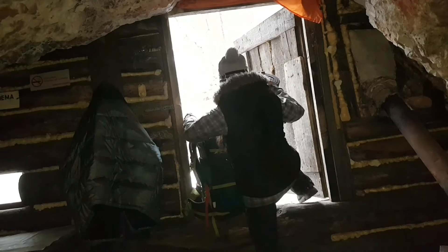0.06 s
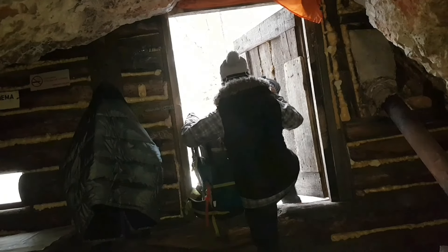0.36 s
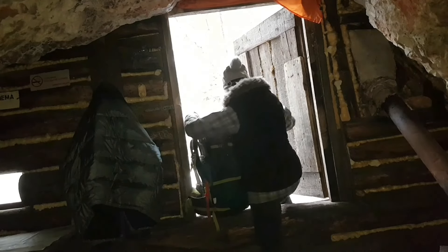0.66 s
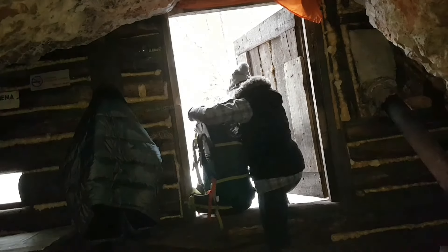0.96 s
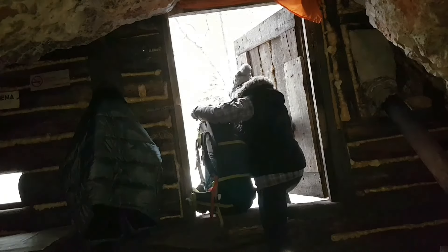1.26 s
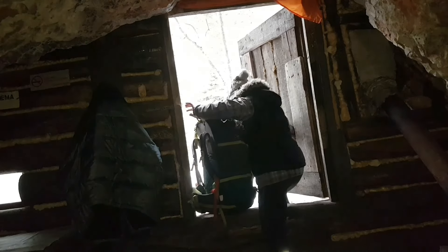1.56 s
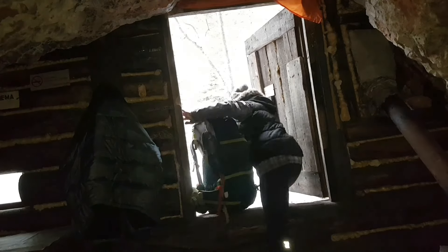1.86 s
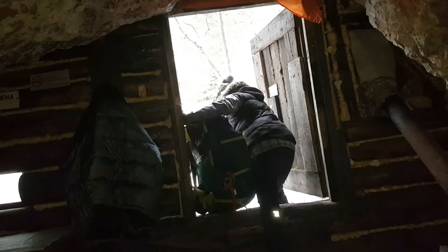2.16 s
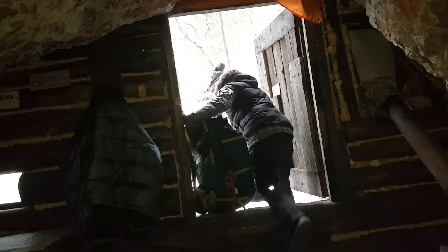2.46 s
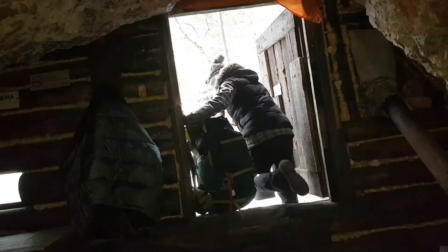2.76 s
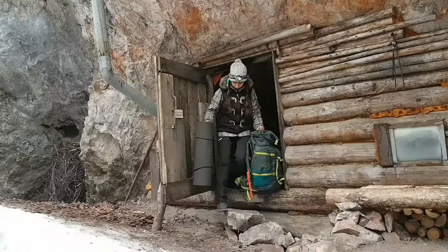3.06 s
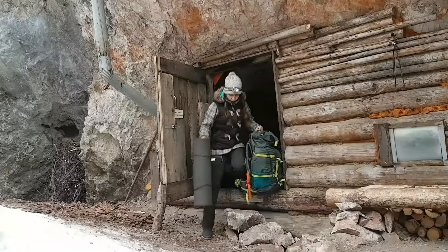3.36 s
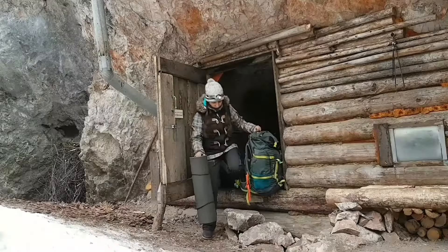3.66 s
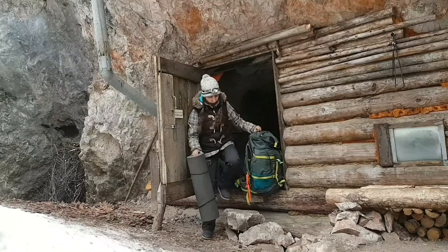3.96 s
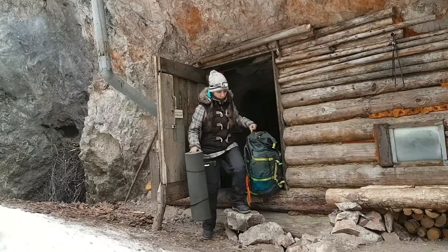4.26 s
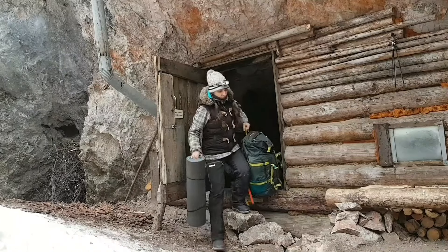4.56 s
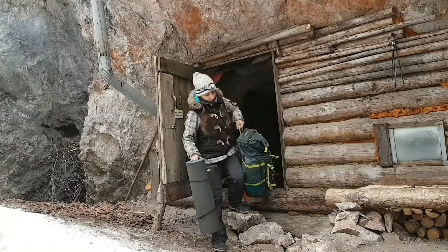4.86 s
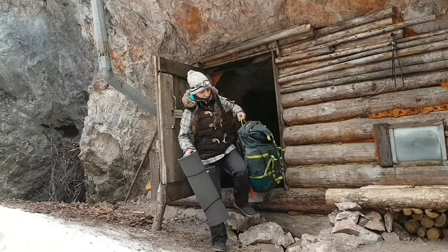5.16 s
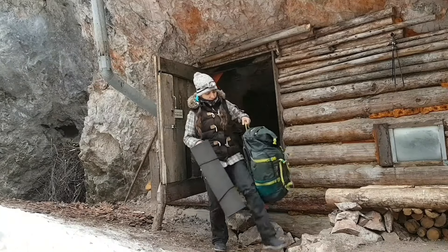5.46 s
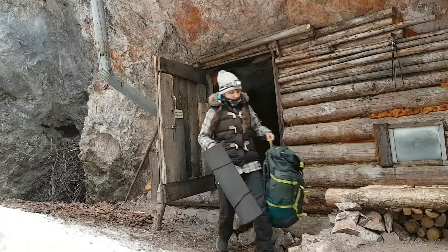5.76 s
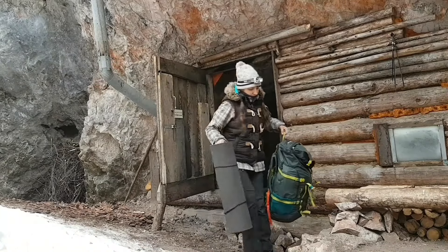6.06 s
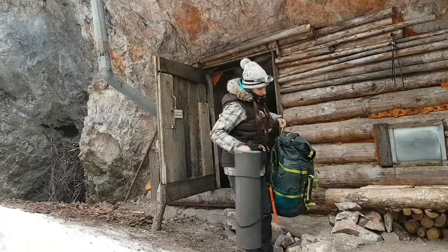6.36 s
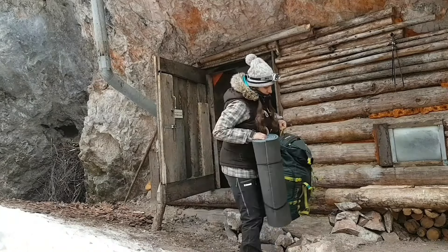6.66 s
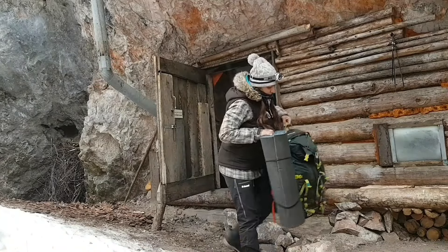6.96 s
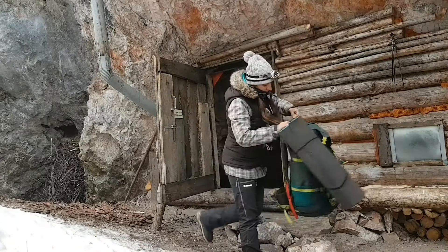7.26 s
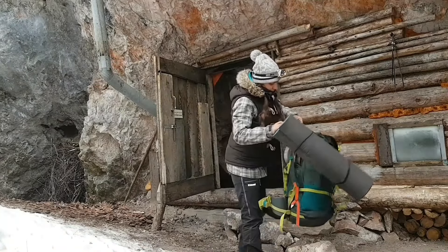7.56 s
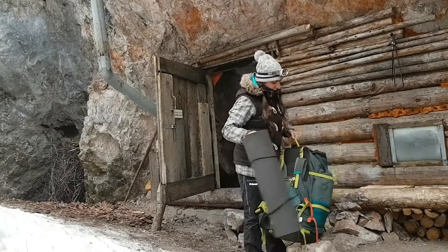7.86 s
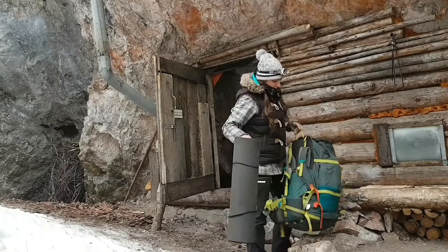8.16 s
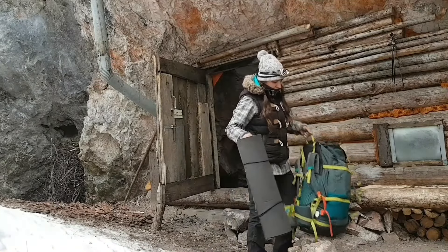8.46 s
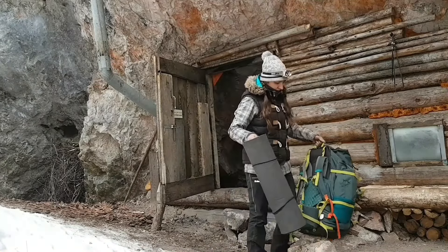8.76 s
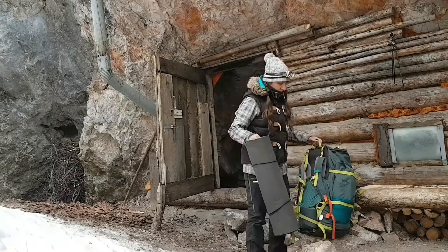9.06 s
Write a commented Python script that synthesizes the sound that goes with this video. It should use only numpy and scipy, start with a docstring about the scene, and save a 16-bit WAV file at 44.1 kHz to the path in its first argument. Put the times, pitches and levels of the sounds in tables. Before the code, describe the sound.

Inside a small log hut, boots and a loaded backpack thud and drag on hollow planks while a padded jacket swishes and straps scrape. After about three seconds the sound jumps outside and turns drier: scattered steps and bumps on stones and gritty soil, softer nylon rustling, a buckle tick, and the pack being set down. A stereo microphone a few metres away also catches faint air and hiss.

```python
"""A log hut in the mountains: a hiker in a padded jacket lugs a backpack over the plank floor and sill.
From 3 s on we listen from outside, where the pack is set down and shifted. Boots and pack thud on
ringing boards, then on stones and gritty soil; nylon swishes and crinkles in tiny catches, straps
scrape and snap, a buckle ticks. A small stereo microphone a few metres away hears it all over
faint mountain air, a draught in the doorway and its own hiss."""
import sys
import numpy as np
from scipy import signal
from scipy.fft import rfft, irfft, next_fast_len
from scipy.io import wavfile
from scipy.ndimage import uniform_filter1d

SR = 44100
rng = np.random.default_rng(int(sys.argv[2]) if len(sys.argv) > 2 else 0)


def inscribe(sig):
    """Save sig as 16-bit PCM at rate SR to the path in sys.argv[1].

    A 1-D sig is mono; a 2-D sig holds one channel per row.
    Samples are clipped to [-1, 1] before scaling.
    """
    pcm = np.round(np.clip(np.atleast_2d(sig).T, -1, 1) * 32767)
    wavfile.write(sys.argv[1], SR, pcm.astype(np.int16))


N = 402191
OUTSIDE_S = 3.008  # the point of view jumps from hut to yard
IDLE_WANDER_DB = 1.1

# tone of still air, scuffed grit, sliding nylon and microphone hiss: f/Hz, relative level/dB
AIR_TONE = [(20, -32), (45, -3), (156, -1), (320, -3.5), (582, -8), (1020, -20), (1750, -17), (2120, -20.5),
            (4200, -28.5), (15500, -44)]
GRIT_TONE = [(150, -26), (250, -24), (335, 5), (852, -6), (1380, -12.5), (1730, -13.5), (2060, -19),
             (3630, -26.5), (6770, -34), (9070, -28.5), (15500, -30)]
NYLON_TONE = [(53, -43), (90, 1), (172, 4), (288, -7.5), (586, -4.5), (810, -8.5), (2050, -9.5),
              (2650, -12), (3800, -18.5), (7140, -24.5), (15500, -41)]
HISS_TONE = [(6500, -17), (8200, -9.5), (15500, -3)]
# stereo width of diffuse sound: f/Hz, side against mid/dB
STEREO_WIDTH = [(60, -9), (250, -7), (500, -6), (1250, 2.5), (2100, 0), (5500, 3.5), (8300, -7),
                (15000, -8)]
# gusts through the doorway: crest t/s, half-length/s, level/dB
DOOR_GUSTS = [(.2, 0.55, -50), (1.376, 0.34, -42.5), (1.89, 0.61, -53.5)]
# boot and pack hits: t/s, thud level/dB, f/Hz, hardness (scuff against thud)/dB, load t60/s
HITS = [(0.001, -33.5, 85.6, -20.5, 0.48), (0.075, -20, 100.5, -21.5, 0.53), (0.099, -24.5, 336, -34, 0.37),
        (0.112, -26, 127, -18, 0.39), (0.183, -28, 161, -12, 0.41), (0.66, -28.5, 94.7, -23, 0.36),
        (0.667, -28.5, 174, -9, 0.3), (0.717, -32, 102, -32, 0.3), (0.908, -32, 110, -15.5, 0.65),
        (1.181, -28.5, 693, -13, 0.32), (1.542, -25.5, 333, -22, 0.37), (1.839, -31.5, 184, -2.5, 0.97),
        (2.078, -35, 486, -9.5, 0.45), (2.486, -44.5, 510, -11, .05), (3.413, -31.5, 514, -8, 0.39),
        (3.416, -38, 104, -11, 0.4), (3.469, -44.5, 260, -5, 0.34), (4.16, -32.5, 124, -17.5, 0.11),
        (4.188, -27.5, 464, -15, 0.27), (4.189, -28, 224, -11, 0.15), (4.219, -35.5, 124, -21, 0.44),
        (4.242, -38, 111, -35, 0.55), (4.573, -31, 160, -10, 0.61), (4.652, -33.5, 400, -10, 0.11),
        (5.62, -29.5, 247, -17, 0.31), (5.761, -42, 438, -6, 0.41), (5.806, -36, 494, -11, 0.17),
        (6.266, -36.5, 416, -14, .1), (6.274, -33.5, 135, -17, 0.42), (6.506, -39.5, 215, -10, 0.43),
        (6.545, -39.5, 174, -20, 0.7), (6.696, -22.5, 97.4, -15.5, 0.16), (6.708, -31, 189, -5.5, 0.085),
        (6.896, -40, 149, -13, 0.64), (7.821, -24, 153, -20, 0.29), (7.992, -36.5, 146, -15, 0.11),
        (8.55, -30.5, 165, -16, 0.39), (8.754, -44.5, 216, -14, 0.091)]
# modes of the plank floor: f/Hz, relative level/dB, t60/s
PLANK_MODES = [(87.6, 4, 0.39), (160, -2.5, 0.36), (203.3, 4, 0.31), (330, -1, 0.54), (543, 10, 0.6)]
# nylon on nylon and wood: crest t/s, half-length/s, swish level/dB, hollow trim/dB, fizz trim/dB
NYLON_STROKES = [(0.057, 0.27, -56, 0.5, -9.5), (0.154, 0.096, -55.5, 6, 1.5),
                 (0.429, 0.48, -56, 2.5, -12.5), (0.772, 0.48, -50, 2, -10), (0.997, 0.61, -60, 6, -15),
                 (1.49, 0.55, -55, 3.5, -14), (1.658, 0.3, -51, 0.5, -12), (1.854, 0.22, -39, -0.5, -11.5),
                 (1.995, 0.26, -46, 1, -13.5), (2.224, 0.27, -50.5, 0.5, -8),
                 (2.351, 0.44, -51.5, -0.5, -10.5), (2.922, 0.042, -71, -6, 12.5),
                 (2.94, 0.99, -57, 1.5, -12.5), (3.442, 0.19, -66.5, 11, -6), (4.618, 0.31, -57, 0.5, -8),
                 (5.337, 0.25, -55.5, -13, -4.5), (5.4, 0.2, -56, -2.5, -8.5), (5.71, 0.29, -61.5, 2, -8),
                 (5.891, 0.15, -61.5, 1.5, -5), (5.983, 0.053, -52.5, -7, -2.5),
                 (6.297, 0.28, -67, 3.5, -9), (6.535, 0.45, -69.5, 6.5, -11),
                 (6.917, 0.089, -59.5, 1.5, -9), (7.025, 0.1, -63, 2.5, -9), (7.127, 0.083, -60, 2, -7),
                 (7.269, 0.3, -57, -7, -11), (7.637, 0.082, -59, 1.5, -17), (7.698, 0.11, -61.5, 1, -16),
                 (7.755, 0.093, -59, -10, -9.5), (7.829, 0.061, -53, 7.5, -12),
                 (7.85, 0.26, -57.5, 1, -8.5), (8.051, 0.19, -48.5, 5, -13.5),
                 (8.11, 0.11, -50, -0.5, -9.5), (8.454, 0.14, -62.5, 5.5, -11), (8.55, 0.14, -48, 6, -9.5),
                 (8.66, 0.19, -61.5, 1.5, -8)]
# treble bands of the crinkling creases: low f/Hz, high f/Hz
CREASE_BANDS = [(8000, 10560), (10200, 13100), (13000, 15100)]
# fabric and straps pulled over an edge: crest t/s, half-length/s, level/dB, start f/Hz, end f/Hz
STRAP_SCRAPES = [(0.073, .04, -47, 1000, 893), (0.134, .05, -50, 1035, 1647),
                 (0.391, 0.11, -60, 2650, 2450), (0.83, 0.2, -56, 2256, 2710),
                 (1.572, 0.073, -49.5, 860, 758), (1.82, 0.051, -41, 1200, 760),
                 (1.88, 0.14, -48.5, 1258, 1500), (1.903, .13, -44, 2200, 1500),
                 (2.215, 0.11, -49, 1495, 1189), (6.633, 0.0397, -53, 250, 280),
                 (7.812, 0.03, -51, 1040, 873), (8.048, .05, -51, 517, 464), (8.461, 0.06, -54.5, 500, 367),
                 (8.553, 0.065, -47.5, 1150, 1450)]
# the loaded pack sliding on the planks: crest t/s, half-length/s, level/dB
PACK_DRAGS = [(0.117, 0.08, -36), (0.21, 0.1, -40.5), (0.707, 0.13, -39.5), (0.834, 0.1, -40),
              (1.89, 0.09, -41)]
# cracks of grit and straps: t/s, peak level/dB, f/Hz
GRIT_SNAPS = [(3.412, -38.5, 1900), (3.498, -49.5, 2370), (4.19, -38, 1630), (5.052, -51, 1800),
              (5.976, -44, 3020), (6.266, -39.5, 726), (6.699, -34, 1330), (8.412, -50, 1400)]
# taps on the buckle: t/s, strike level/dB
BUCKLE_TAPS = [(5.056, -48), (5.866, -38.5), (5.875, -37.5)]
# modes of the plastic buckle: f/Hz, relative level/dB, t60/s
PLASTIC_MODES = [(4660, -6.5, 0.013), (5390, -12, 0.0092), (12400, -14, .005)]
# the hiker's rustle moves to the right in the yard: t/s, left channel lag/ms
LEFT_LAG = [(5.8, 0.0098), (8.2, 0.16)]


def undb(db):
    """Decibels to gain."""
    return 10 ** (np.asarray(db) / 20)


def unit(x):
    """Scale to rms 1."""
    return x / np.sqrt(np.mean(x ** 2))


def fade(t, t60):
    """Exponential decay, 60 dB down at t60."""
    return np.exp(-np.log(1000) * t / max(t60, 1e-3))


def add(track, s, sound):
    """Mix a sound into a track at time s."""
    i = max(int(s * SR), 0)
    track[i:i + len(sound)] += sound[:N - i]


def colour(x, points):
    """EQ with a curve of f/Hz, level/dB points."""
    size = next_fast_len(N, True)
    hz, db = np.transpose(points)
    f = np.maximum(np.arange(size // 2 + 1) * SR / size, 1)
    curve = undb(np.interp(np.log(f), np.log(hz), db))
    return irfft(rfft(x, size) * curve, size)[..., :N]


def band(x, lo_hz, hi_hz, order=2):
    """Band-pass."""
    return signal.sosfilt(signal.butter(order, [lo_hz, hi_hz], "band", fs=SR, output="sos"), x)


def wander(rate_hz):
    """Random modulator at rms 1, gliding from value to value."""
    hold = int(SR / rate_hz)
    return unit(uniform_filter1d(np.repeat(rng.standard_normal(N // hold + 1), hold), hold)[:N])


def grains(per_s, spread_db, smooth_db):
    """Mid and side of tiny catches of uneven size over a smooth hiss."""
    hiss = rng.standard_normal((2, N))
    sizes = undb(spread_db * np.minimum(rng.exponential(size=N), 4))
    catches = sizes * (rng.random(N) < per_s / SR)
    return unit(catches * rng.standard_normal((2, N))) + undb(smooth_db) * hiss


def stereo(pair, side_db):
    """Mid and side to left and right, with the mid at rms 1."""
    mid, side = pair[0], undb(side_db) * colour(pair[1], STEREO_WIDTH)
    return np.array([mid + side, mid - side]) / np.std(mid)


def resonate(x, modes):
    """Ring a set of damped modes with x."""
    t = np.arange(SR // 2) / SR
    ring = sum(undb(db) * np.sin(2 * np.pi * hz * t) * fade(t, t60) for hz, db, t60 in modes)
    return signal.fftconvolve(x, ring)[:N]


def swell(crest, half_s, rise_share=0.47, flatness=1.75):
    """Envelope of a move that gathers speed and runs out smoothly."""
    speed = np.zeros(N)
    start, end = crest - 2 * rise_share * half_s, crest + 2 * (1 - rise_share) * half_s
    t = np.arange(max(start, 0), end, 1 / SR)
    add(speed, t[0], np.exp(-2 * np.interp(t, [start, crest, end], [2, 0, 2]) ** flatness))
    return speed


def air_bed(air_db=-60.5, stir_db=-68, hiss_db=-69):
    """Steady mountain air, a faint uneven stir of clothes and mono microphone hiss."""
    air = stereo(colour(rng.standard_normal((2, N)), AIR_TONE), side_db=-0.11)
    stir = stereo(band(rng.standard_normal((2, N)), 350, 1030), side_db=-1.1)
    stir *= undb(IDLE_WANDER_DB * wander(9) + 2 * wander(45))
    hiss = unit(colour(rng.standard_normal(N), HISS_TONE))
    return undb(air_db) * air + undb(stir_db) * stir + undb(hiss_db) * hiss


def draught(steady_db=-71.5):
    """Air through the doorway rumbles on the microphone, with a few gusts."""
    flow = undb(steady_db) + sum(undb(db) * swell(s, half_s) for s, half_s, db in DOOR_GUSTS)
    return flow * unit(band(rng.standard_normal(N), 15, 72))


def boot_and_pack_hits(contact_cycles=0.37, sag=0.1, sag_cycles=0.61, overtone_ratio=2.54,
                       padding_hz=420, shake_db=-15, shake_cycles=26, load_db=-14, settle_db=-21):
    """Two layers: damped thuds with the rumble of the shaken load, and scuffs of crushed grit."""
    thuds, scuff_power = np.zeros((2, N))
    t = np.arange(SR // 2) / SR
    for s, db, hz, hard_db, load_t60 in HITS:
        sustain, load_hz = (2.46, (69.5, 194)) if s < OUTSIDE_S else (1, (97, 214))  # planks or soil
        t60 = sustain * 0.07 * (99 / hz) ** 0.69  # higher thuds die sooner
        contact = 1 - np.exp(-(t * hz / contact_cycles) ** 2)  # soft soles push for part of a cycle
        pitch = hz * (1 + sag * (np.exp(-t * hz / sag_cycles) - 1 / np.e))  # sags under the weight
        phase = 2 * np.pi * np.cumsum(pitch) / SR
        # hard contact wakes the overtone, padding dulls it
        knock = undb(6 + 0.85 * hard_db) / (1 + (hz / padding_hz) ** 4)
        overtone = knock * np.sin(overtone_ratio * phase) * fade(t, t60 / 2)
        thud = contact * (np.sin(phase) * fade(t, t60) + overtone)
        shake = unit(band(rng.standard_normal(len(t)), hz * 0.68, hz * 1.28))
        shake *= fade(t, shake_cycles / hz)
        load = unit(band(rng.standard_normal(len(t)), *load_hz)) * fade(t, load_t60)
        rumble = (undb(shake_db) * shake + undb(load_db) * load) * (1 - np.exp(-t / 0.004))
        add(thuds, s, undb(db) * (thud / np.abs(thud).max() + rumble))
        # grit crushes fast, then settles in a quiet tail
        crush = fade(t, t60=sustain * 0.082) + undb(settle_db) * fade(t, t60=0.66)
        attack = 1 - np.exp(-t / 0.0017)
        add(scuff_power, s, (undb(db + hard_db) * attack * crush) ** 2)
    grit = stereo(colour(grains(per_s=5000, spread_db=2.3, smooth_db=1), GRIT_TONE), side_db=-3)
    return thuds, np.sqrt(scuff_power) * grit


def plank_ring(thuds, send_db=-62):
    """The floorboards ring under boots and pack."""
    return undb(send_db) * resonate(thuds, PLANK_MODES)


def hut_reverb(x, t60=0.26, predelay_s=0.006, wet_db=-16):
    """A short, dull room tail between log walls."""
    t = np.arange(SR // 2) / SR
    tail = band(rng.standard_normal((2, len(t))), 220, 5600, order=1) * fade(t, t60) * (t > predelay_s)
    tail /= np.sqrt(np.sum(tail ** 2) / 2)
    return undb(wet_db) * signal.fftconvolve(x, tail, axes=1)[:, :N]


def nylon_rub(strokes, side_db, catch_db, drum_db, drum_low_hz, idle_db, idle_fizz_db,
              echo_db=-19, echo_s=0.009, crinkle_db=1.44):
    """Nylon slides in small catches. Two layers: folds swishing over the hollow pack, and top fizz."""
    idle = undb(idle_db + IDLE_WANDER_DB * wander(9))  # the jacket never quite keeps still
    power = (idle * undb([[0], [0], [idle_fizz_db]])) ** 2
    for s, half_s, swish_db, hollow_db, fizz_db in strokes:
        power += (swell(s, half_s) * undb(swish_db) * undb([[hollow_db], [0], [fizz_db]])) ** 2
    hollow_gain, swish_gain, fizz_gain = np.sqrt(power)
    weave = colour(grains(per_s=9000, spread_db=0.3, smooth_db=2.3), NYLON_TONE)
    # eight dull, wavering early echoes from boards and rock ripple the tone
    lags = (rng.uniform(0.098, 1, (8, 2)) * echo_s * SR).astype(int)
    dull = band(weave, 84, 2800)
    echoes = sum(wander(14) * np.array([np.roll(dull[0], a), np.roll(dull[1], b)]) for a, b in lags)
    cloth = stereo(weave + undb(echo_db) * echoes, side_db) * undb(catch_db * wander(90))
    # creases of different sizes crinkle, each in its own part of the treble
    crackle = stereo(grains(per_s=2500, spread_db=0.77, smooth_db=0), side_db + 1)
    creases = sum(band(crackle, *hz, order=3) * undb(crinkle_db * wander(40)) for hz in CREASE_BANDS)
    parts = [band(cloth, *hz, order=3) for hz in [(drum_low_hz, 238), (332, 977), (897, 7500)]]
    drum, hollow, swish, fizz = (part / np.std(part.mean(0)) for part in parts + [creases])
    body = undb(1.5) * hollow + undb(drum_db) * drum
    return hollow_gain * body + swish_gain * swish, undb(3) * fizz_gain * fizz


def strap_scrapes(rows, width_share=0.25, judder_hz=120, judder_db=2.2, waver=0.0396):
    """Stick and slip excite one broad resonance of taut fabric, gliding as the tension changes."""
    t = np.arange(N) / SR
    pair = np.zeros((2, N))
    judder = unit(undb(judder_db * wander(judder_hz)))
    wobble = 1 + waver * wander(60)
    for s, half_s, db, start_hz, end_hz in rows:
        speed = swell(s, half_s)
        on = speed > 0
        pitch = np.interp(t[on], [s - half_s, s + half_s], [start_hz, end_hz]) * wobble[on]
        phase = 2 * np.pi * np.cumsum(pitch) / SR
        lowpass = signal.butter(2, width_share * start_hz / 2, fs=SR, output="sos")
        slips = unit(signal.sosfilt(lowpass, rng.standard_normal((2, 2, SR))))[..., -len(phase):]
        rasp = slips[0] * np.cos(phase) + slips[1] * np.sin(phase)  # a noise band around the pitch
        pair[:, on] += undb(db) * speed[on] * judder[on] * rasp
    mid, side = pair[0], colour(pair[1], STEREO_WIDTH)
    return np.array([mid + side, mid - side])


def pack_drags(rumble_hz=(100, 229)):
    """The base of the pack catches and slips on the boards, so densely that it rumbles."""
    speed = sum(undb(db) * swell(s, half_s) for s, half_s, db in PACK_DRAGS)
    catches = grains(per_s=600, spread_db=0.58, smooth_db=0)[0]
    return speed * unit(band(catches, *rumble_hz))


def grit_snaps(t60=0.007, edge_ratio=1.34, side_db=-7):
    """Grit gives way or a strap pulls taut: a few milliseconds of broad crack."""
    left, right = np.zeros((2, N))
    t = np.arange(SR // 20) / SR
    for s, db, hz in GRIT_SNAPS:
        crack = band(rng.standard_normal((2, len(t))) * fade(t, t60), hz / edge_ratio, hz * edge_ratio)
        mid, side = undb(db) * crack / np.abs(crack).max(1, keepdims=True)
        add(left, s, mid + undb(side_db) * side)
        add(right, s, mid - undb(side_db) * side)
    return np.array([left, right])


def buckle_ticks(tick_db=10):
    """A plastic buckle chatters against its strap: a bright tick with a tiny ring."""
    taps = np.zeros(N)
    t = np.arange(SR // 20) / SR
    for s, db in BUCKLE_TAPS:
        chatter = rng.standard_normal(len(t)) * fade(t, t60=0.069)
        add(taps, s, undb(db) * chatter / np.linalg.norm(chatter))
    return resonate(taps, PLASTIC_MODES) + undb(tick_db) * band(taps, 2000, 14000, order=1)


def scene():
    """The hut first, then the yard, over one bed of air."""
    t = np.arange(N) / SR
    thuds, scuffs = boot_and_pack_hits()
    thuds += pack_drags()
    steps = scuffs + thuds * undb([[-0.9], [0.9]])
    # in the hut the planks ring and the walls answer
    rub, fizz = nylon_rub([row for row in NYLON_STROKES if row[0] < OUTSIDE_S], side_db=-2.5,
                          catch_db=1.13, drum_db=-4, drum_low_hz=71.5, idle_db=-70.5, idle_fizz_db=-7.5)
    cloth = rub + fizz + strap_scrapes([row for row in STRAP_SCRAPES if row[0] < OUTSIDE_S])
    hut = steps + cloth + plank_ring(thuds) + draught() + hut_reverb(steps + cloth)
    # the yard is dry, and the rustle reaches the right channel first
    rub, fizz = nylon_rub([row for row in NYLON_STROKES if row[0] > OUTSIDE_S], side_db=-5.5,
                          catch_db=1.1, drum_db=-7.5, drum_low_hz=112, idle_db=-73, idle_fizz_db=-12)
    rub += strap_scrapes([row for row in STRAP_SCRAPES if row[0] > OUTSIDE_S])
    lag_s = np.interp(t, *np.transpose(LEFT_LAG)) / 1000
    rub[0] = np.interp(t - lag_s, t, rub[0])
    yard = steps + rub * undb([[0.3], [1.7]]) + fizz + grit_snaps() + buckle_ticks()
    return np.where(t < OUTSIDE_S, hut, yard) + air_bed()


def record(dry):
    """The level dips briefly as the point of view jumps; the top end is cut steeply."""
    dip_db, dip_s, top_hz = -11, 0.016, 15850
    t = np.arange(N) / SR
    dip = uniform_filter1d(1.0 * ((t > OUTSIDE_S) & (t < OUTSIDE_S + dip_s)), size=100)
    high_cut = signal.ellip(12, 0.2, 80, top_hz, fs=SR, output="sos")
    return signal.sosfilt(high_cut, dry * undb(dip_db * dip))


dry = scene()
out = record(dry)
inscribe(out)
```